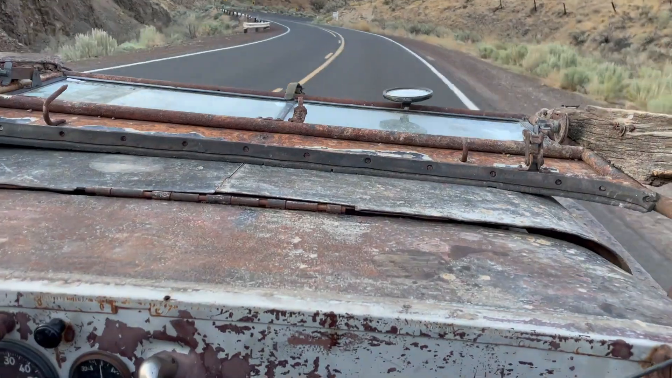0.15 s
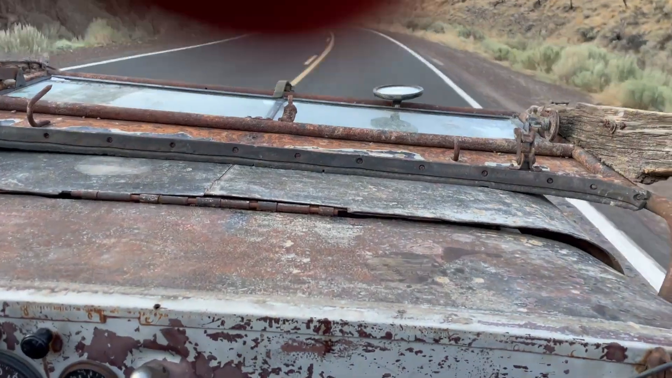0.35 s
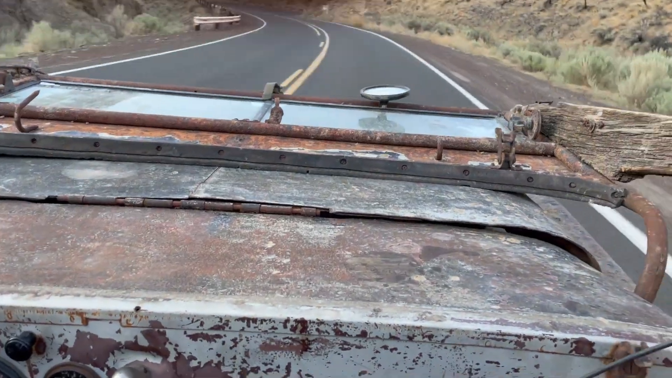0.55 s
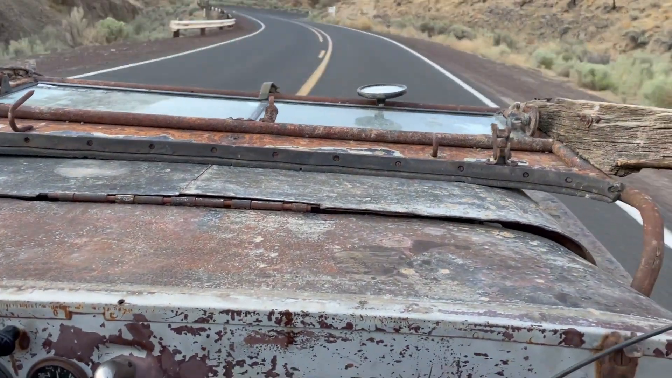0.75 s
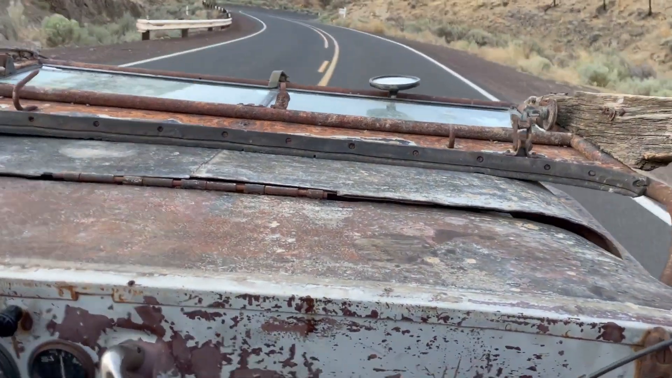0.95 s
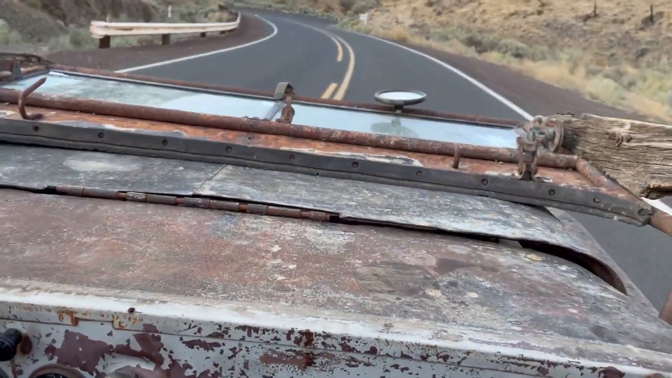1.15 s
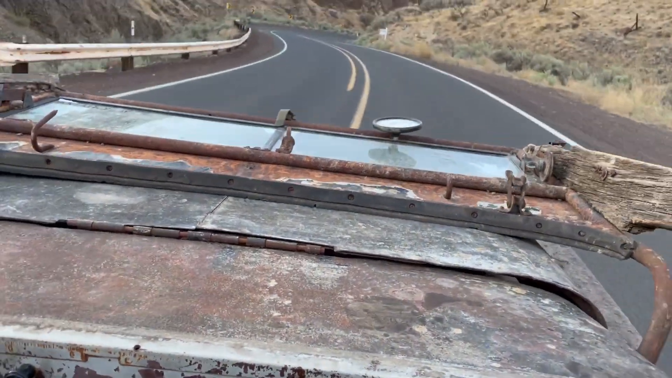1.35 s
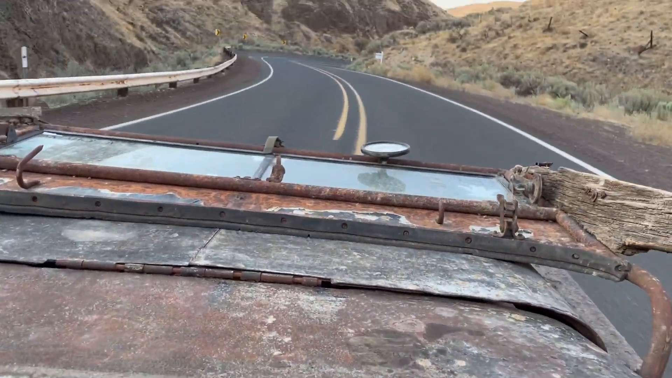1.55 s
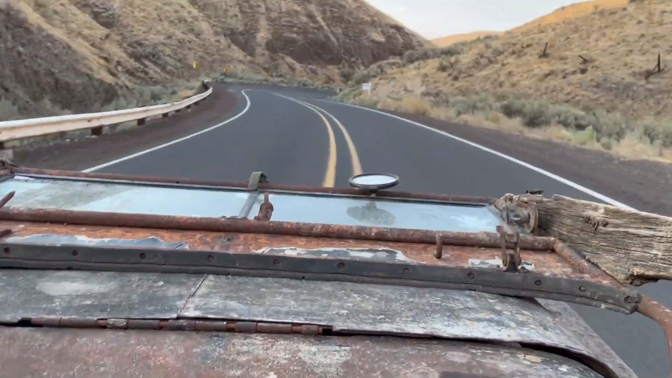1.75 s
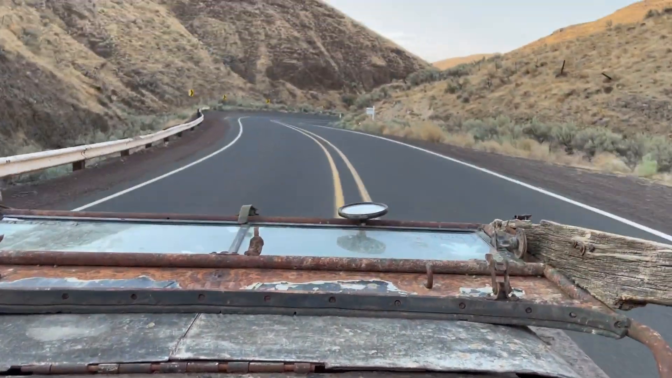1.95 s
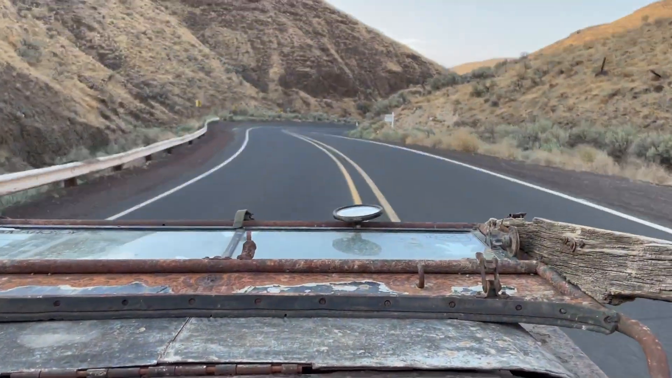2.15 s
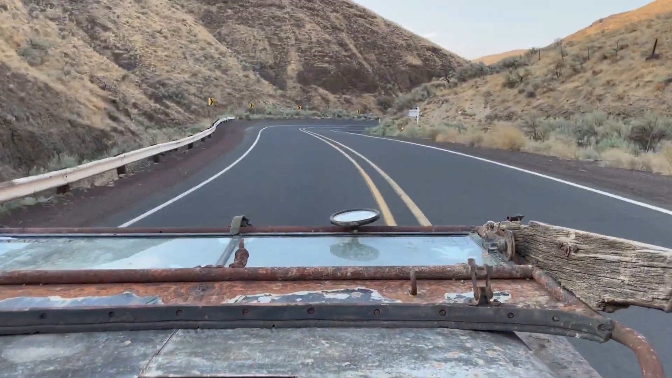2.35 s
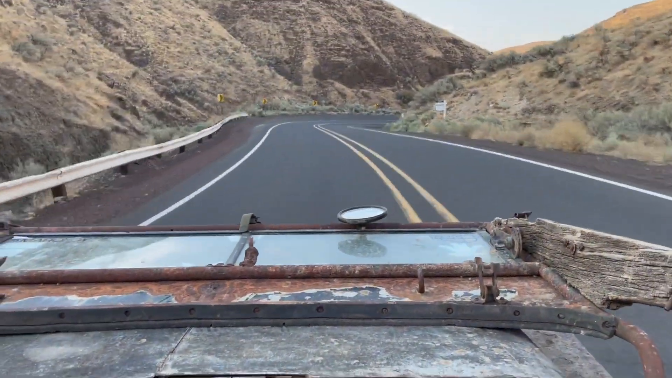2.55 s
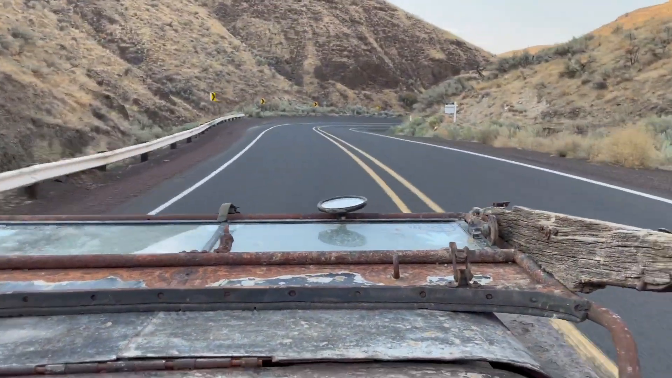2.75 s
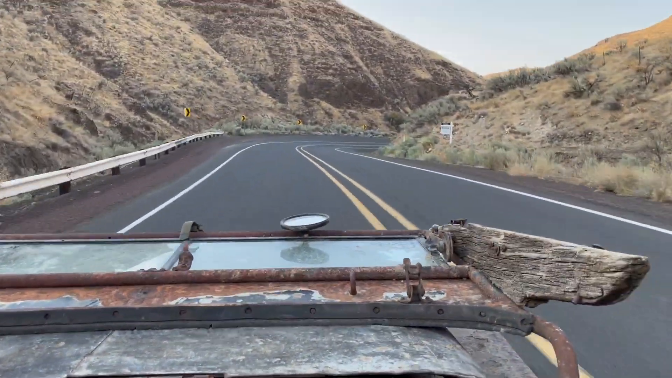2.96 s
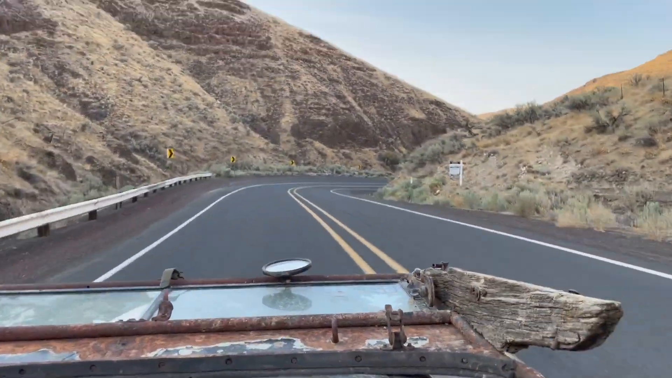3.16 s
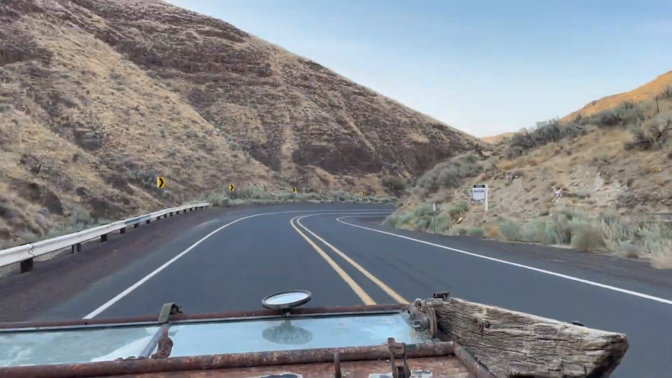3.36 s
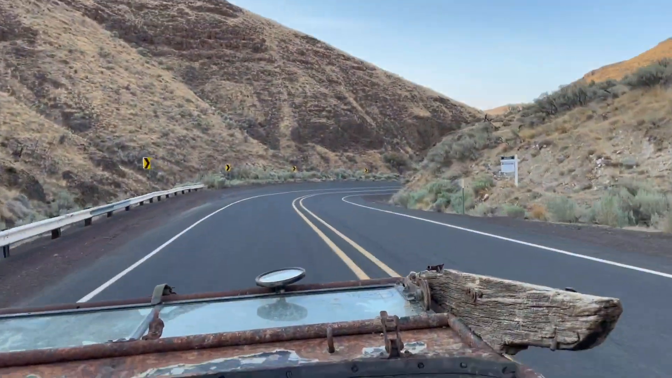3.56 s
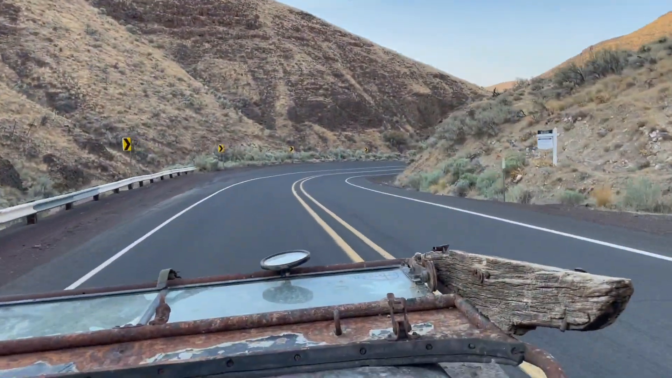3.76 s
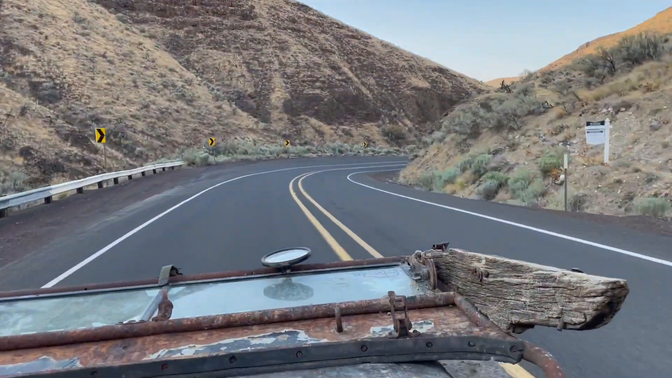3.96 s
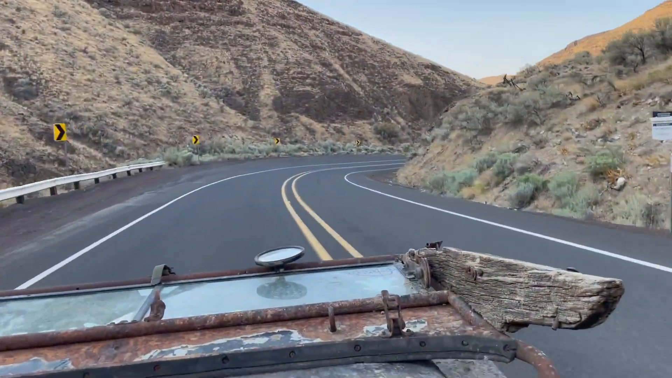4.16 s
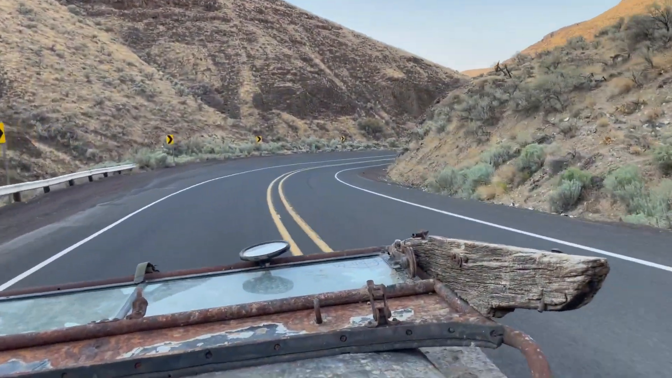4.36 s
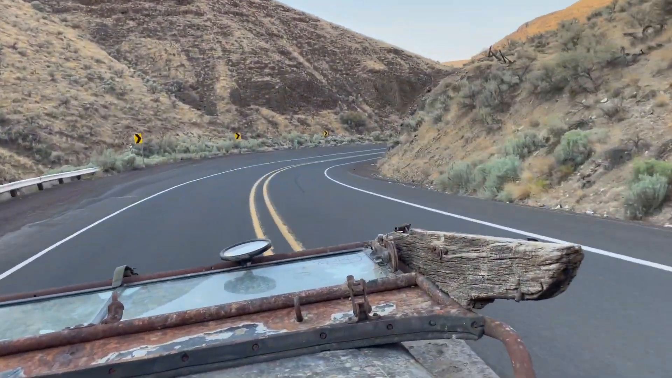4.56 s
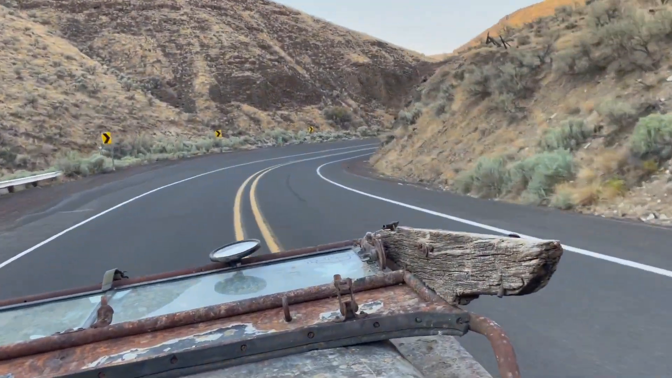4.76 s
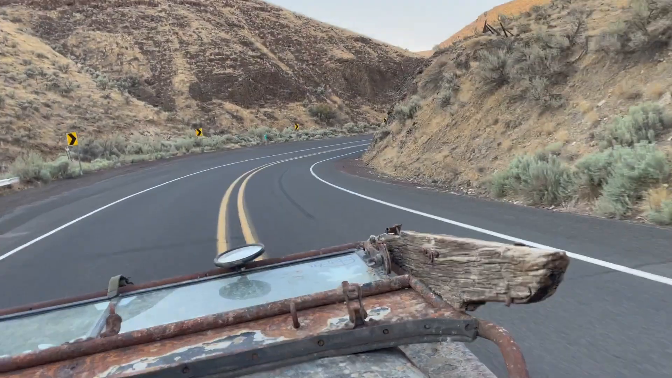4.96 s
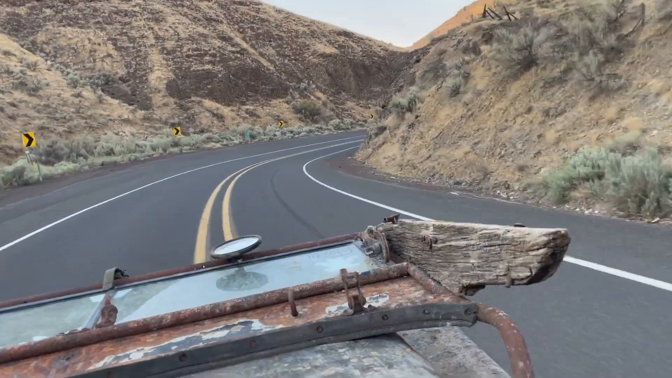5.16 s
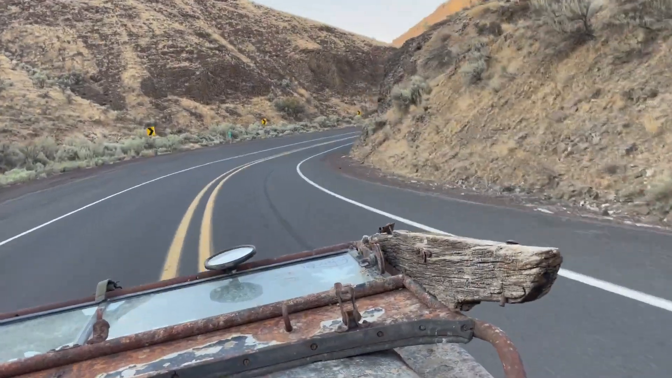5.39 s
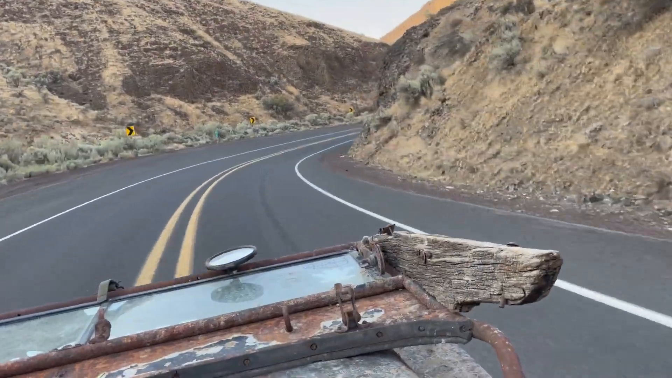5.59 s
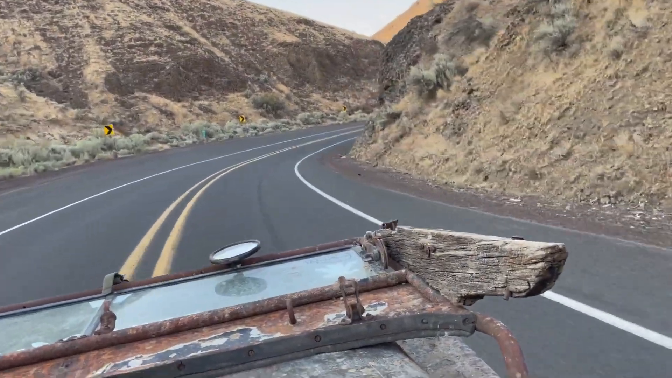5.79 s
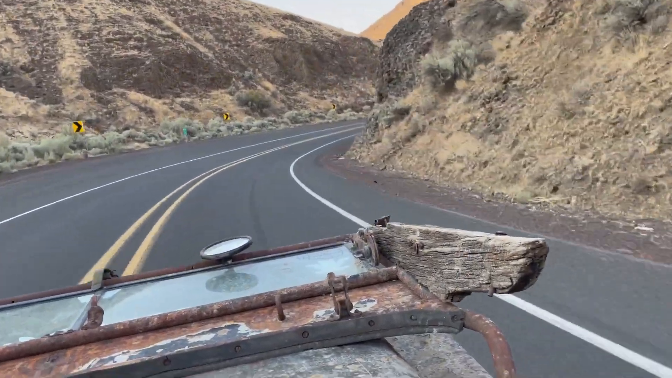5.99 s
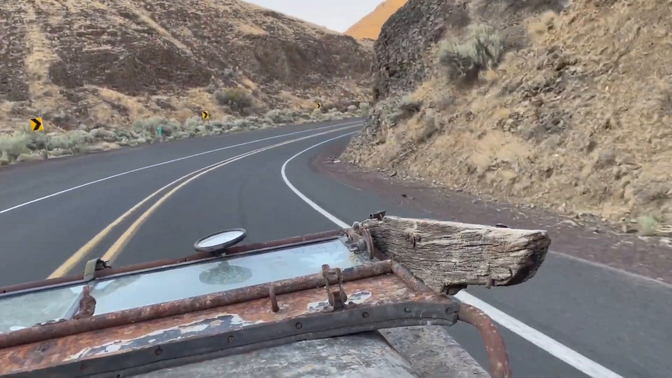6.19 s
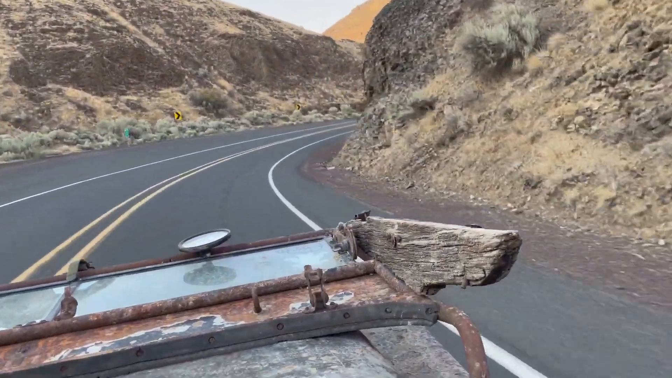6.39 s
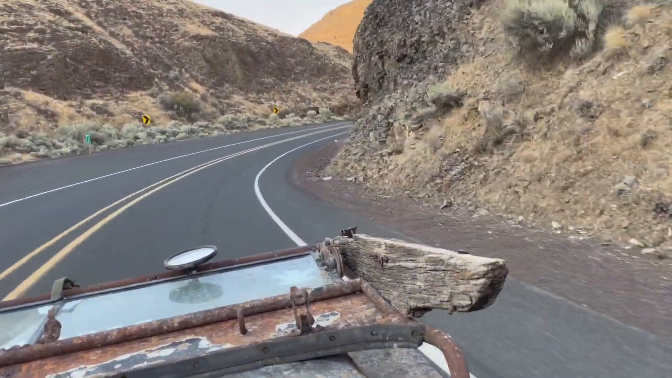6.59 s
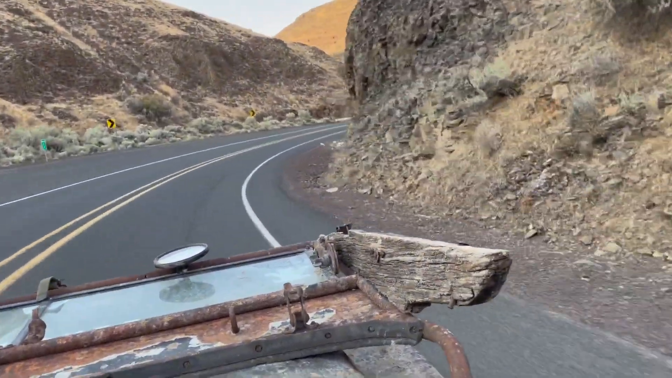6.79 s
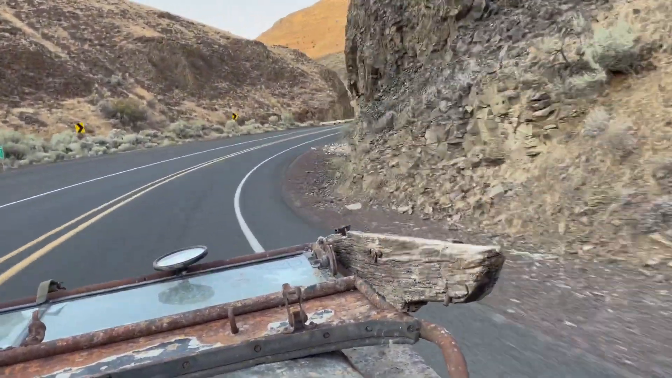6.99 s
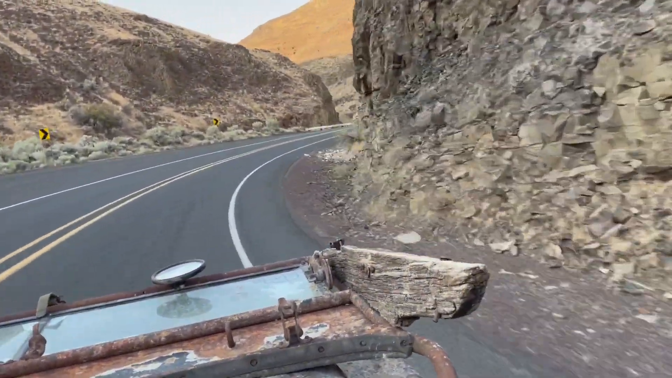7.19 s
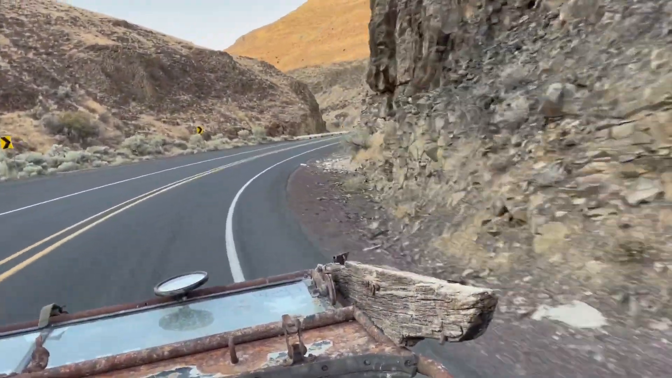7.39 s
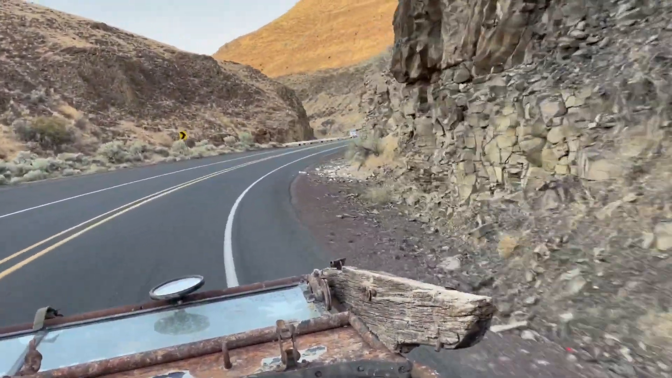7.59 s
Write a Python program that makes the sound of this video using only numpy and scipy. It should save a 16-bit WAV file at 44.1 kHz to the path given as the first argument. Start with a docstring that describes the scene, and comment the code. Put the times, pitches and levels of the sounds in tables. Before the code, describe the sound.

In an old open vehicle rolling fast down a paved canyon road, wind hits the unprotected stereo microphone. A thud and a band of airy rush, stronger on the left, open it; the rush fades after about a second as the wind swells into rough roaring, slapping and popping. Later it eases a little but keeps surging in gusts. Steady engine drone, tyre roar and thin hiss lie underneath, with a few dull metal knocks.

```python
"""Wind on a camera in an open vehicle

Wind buffets the two microphone ports of a camera held in an open vehicle rolling fast downhill.
Filtered noise, moved by gusts and random flutter, makes the thud, roar, rasp and fizz of the wind.
Short noise bursts are eddies that slap, puff, pop and crackle; a band of airy noise fades early on.
Underneath, steady noise makes the engine drone and tyre roar, and short rings are loose metal
knocking. The tyre hiss is one noise that reaches the two ports out of step.
"""
import sys
import numpy as np
from scipy import signal
from scipy.fft import rfft, irfft, next_fast_len
from scipy.io import wavfile
from scipy.ndimage import uniform_filter1d

SR = 44100
rng = np.random.default_rng(int(sys.argv[2]) if len(sys.argv) > 2 else 0)


def convert_level_to_amplitude(level_db):
    """Map a level in decibels to its linear amplitude factor."""
    exponent = np.asarray(level_db, float) / 20
    return 10 ** exponent


def persist_wave(psi):
    """Save psi, clipped to +-1, as 16-bit WAV."""
    counts = np.round(np.clip(psi, -1, 1) * 32767).astype(np.int16)
    wavfile.write(sys.argv[1], SR, np.atleast_2d(counts).T)


N = 336686
T = np.arange(N) / SR
HZ = np.fft.rfftfreq(N, 1 / SR)
SIDES = np.array([[0.5], [-0.5]])  # shares a left-over-right difference in dB between the ports

# Engine and tyre drone: [f/Hz, width/Hz, level/dB]
DRONE = [(74, 81, -35.5)]
# Colour of the tyre roar: [f/Hz, relative level per Hz/dB]
ROAD_COLOUR = [(200, 15), (500, 8), (1200, 11.5), (2000, 2.5), (2650, -3), (3000, -17), (4600, -11),
               (5400, -16.5)]
ROAD_DB = -31.5

# Strength of the tyre hiss: [t/s, level from about 7.5 to 14 kHz/dB]
HISS_LEVEL = [(0.04, -55.5), (0.65, -56.5), (3.34, -58.5), (3.67, -61), (4.46, -59.5), (4.61, -60.5),
              (6.83, -61), (7.02, -57.5), (7.63, -60)]
# Colour of the tyre hiss: [f/Hz, relative level per Hz/dB]
HISS_COLOUR = [(3000, -15), (4300, 3), (5600, 10), (6500, 9.5), (7700, 10), (9000, 7), (10500, 6),
               (12500, 3.5), (13300, -1), (14800, 3), (15800, -2)]
# How far the left port is ahead in the hiss: [f/Hz, lead/cycles]
HISS_LEAD = [(3200, 1.4), (4300, 1), (5300, .5), (6500, 0), (8250, -.5), (9800, -.75), (11500, -1),
             (13200, -1.25), (14600, -1.5)]

# Loose metal knocking on the body:
# [t/s, ring peak level/dB, main ring f/Hz, left over right/dB, tick over ring/dB]
METAL_KNOCKS = [(2.182, -14, 2540, -8, -40), (2.378, -13, 2350, 4, -40), (2.7334, -12, 2170, -2, -30),
                (4.529, -14, 2250, 2, -36), (7.05, -13.5, 2850, 5, -24)]
# Rings of the loose part: [multiple of the main ring, relative level/dB, time to fall 60 dB/s]
METAL_RINGS = [(.72, -9, .007), (1.0, 0, .013), (1.22, -5, .009), (1.6, -12, .006), (2.05, -19, .006)]

# Airy rush: band edges, level at left and right port, middle and time scale of its fade
RUSH_HZ, RUSH_DB, RUSH_END_S, RUSH_FADE_S = (1960, 2630), (-34.5, -43.5), 1.1, 0.12

# Tiny snaps at the left and right port: rate, level before size and band weighting
CRACKLE_PER_S, CRACKLE_DB = [380, 320], [-35.5, -35]

# Small eddies snapping at a port:
# [t/s, body peak level above 1.5 kHz/dB, centre f/Hz, bright edge over body/dB, left over right/dB]
EDDY_POPS = [(0.0863, -25, 2820, -25, 1), (0.2268, -22, 2380, -25, 5), (0.239, -23, 3300, -30, 4),
             (0.2914, -22, 4000, -16, 7), (0.2951, -24, 2820, -29, 6), (0.3876, -20, 2220, -31, 10),
             (0.4175, -21, 3180, -36, 7), (0.4568, -18, 2200, -20, 9), (0.473, -20, 2600, -30, 5),
             (0.485, -22, 2800, -30, 5), (0.575, -13, 2390, -32, 6), (0.5914, -15, 3990, -28, 7),
             (0.603, -19, 2500, -30, 5), (0.6216, -19, 2210, -29, 8), (0.7743, -17, 3000, -32, 10),
             (0.8655, -16, 2910, -31, 10), (0.9164, -20, 2890, -35, -4), (0.9866, -15, 2880, -29, 6),
             (1.0777, -17, 2720, -33, 1), (1.1826, -20, 3530, -32, 10), (1.2373, -14, 2640, -33, 1),
             (1.275, -18, 3180, -33, -1), (1.37, -11, 2500, -29, 3), (1.3774, -16, 2970, -31, 10),
             (1.477, -14, 3470, -33, 4), (1.557, -10, 3110, -28, 9), (1.6567, -14, 2180, -35, 1),
             (1.7135, -17, 2600, -29, 5), (1.769, -18, 3170, -32, 7), (1.7983, -10, 2870, -29, 8),
             (1.9281, -19, 2420, -27, 3), (1.9595, -18, 2480, -32, 1), (1.9909, -18, 2900, -34, -10),
             (2.0656, -17, 3010, -26, 5), (2.141, -13, 2970, -41, 10), (2.3371, -18, 2540, -34, -1),
             (2.3596, -20, 2960, -31, 10), (2.4618, -17, 2460, -31, 8), (2.4868, -15, 3070, -31, -1),
             (2.7278, -12, 2140, -29, -1), (2.7404, -15, 2540, -38, -4), (2.8224, -14, 2410, -29, 6),
             (2.8402, -13, 2240, -32, 2), (2.8467, -11, 2720, -35, 7), (3.0382, -16, 2840, -36, -10),
             (3.1, -19, 2940, -30, 3), (3.245, -15, 2300, -28, 1), (3.2516, -14, 2320, -20, 5),
             (3.3688, -16, 2830, -35, 2), (3.5034, -15, 2340, -39, 3), (3.9058, -19, 3530, -28, 1),
             (3.933, -22, 2140, -28, 10), (4.4897, -22, 2760, -33, 10), (4.5243, -13, 2030, -37, 6),
             (4.592, -11, 3610, -30, 4), (4.9095, -15, 2800, -32, 8), (5.14, -16, 2000, -41, -10),
             (5.1923, -15, 1900, -32, 9), (5.3573, -21, 2990, -32, -3), (5.9386, -13, 1870, -41, 9),
             (6.467, -25, 2160, -28, -5), (6.8443, -20, 2550, -33, 8), (6.85, -22, 3000, -30, 5),
             (6.87, -17, 3180, -32, 7), (6.9427, -22, 2250, -30, 0), (7.0616, -20, 2930, -17, 6),
             (7.435, -25, 2950, -36, -4), (7.4834, -21, 3090, -31, 0)]
# Wide colour of pops, also the weight of crackle bands: [f/Hz, relative level per Hz/dB]
POP_COLOUR = [(500, 7), (1500, 18.5), (3000, 5), (5000, 0), (7000, -5)]
POP_WIDTH, POP_SKIRT_DB = 0.42, 2  # spread in log frequency, relative weight of the dull skirt
POP_RISE_S, POP_ALIKE = 0.00059, 2  # rise, weight of the noise common to both ports

# Small eddies of the roar: rate, level against the roar curve before the random size
PUFFS_PER_S, PUFF_DB = 140, -12
PUFF_SPREAD_DB, PUFF_CYCLES = 1.67, 0.88  # spread of sizes, rise in cycles of the centre frequency

# Large eddies slapping both ports: [t/s, peak level of the port average/dB, centre f/Hz]
EDDY_SLAPS = [(0.469, -13.5, 288), (0.6, -13, 627), (0.691, -20, 460), (0.881, -10, 293), (1.0, -8, 203),
              (1.049, -8, 237), (1.073, -3.5, 470), (1.17, -9, 323), (1.227, -11, 229), (1.311, -13, 250),
              (1.433, -4, 343), (1.801, -5.5, 396), (1.882, -10, 573), (1.931, -8.5, 175), (2.064, -8, 340),
              (2.113, -4.5, 375), (2.144, -2.5, 343), (2.487, -8, 293), (2.591, -4.5, 457),
              (2.654, -8.5, 510), (2.76, -9, 365), (2.834, -4, 286), (2.923, -12, 307), (3.026, -8, 364),
              (3.071, -10.5, 401), (3.104, 1, 217), (3.24, -8, 272), (3.322, -8, 400), (3.839, -11, 200),
              (3.906, -8.5, 232), (3.942, -11, 458), (4.381, -12, 396), (4.522, -12, 895),
              (4.571, -14, 323), (4.586, -17, 800), (4.694, -11, 303), (4.806, -6, 229), (5.002, -25, 335),
              (5.086, -9.5, 361), (5.136, -12, 670), (5.218, -11, 340), (5.254, -8, 423), (5.341, -11, 188),
              (5.44, -8.5, 300), (5.763, -6, 296), (5.889, -10, 440), (6.03, -24, 215), (6.186, -11.5, 626),
              (6.287, -16, 240), (6.673, -26, 440), (6.781, -17, 294), (6.85, -28, 1800), (6.904, -23, 410),
              (7.063, -16, 1200), (7.383, -12, 336), (7.599, -13, 262)]

# Slow course of the wind past the ports:
# [t/s, roar level before layer shares/dB, thud over roar/dB, treble over roar/dB]
WIND_COURSE = [(0.04, -24.5, 14, -5), (0.3, -22, 5.5, -4), (0.65, -19, -0.5, -7.5), (0.95, -15.5, 1.5, 0.5),
               (1.25, -8, -6.5, -11.5), (1.6, -16, 4, -5), (2, -13, -10, -8), (2.4, -15.5, -1, -6),
               (2.9, -15, -2.5, -5), (3.3, -13.5, -4, -7), (3.55, -14.5, -4.5, -5.5),
               (3.75, -19.5, 4.5, -6), (4.1, -20, -1.5, -3), (4.5, -19.5, 6, -8), (4.9, -20, -3, 0),
               (5.3, -16, -5, -9), (5.6, -19.5, -4, -4.5), (5.9, -18, -0.5, -4.5), (6.2, -22.5, -8, -4.5),
               (6.6, -24.5, 7, -5), (7, -16, -4, -9.5), (7.3, -19.5, -5, -5), (7.63, -23, 5, -2)]
# Short changes of the wind, mostly surges; negative values are dips, often with brighter air.
# Before each layer takes its share: [middle t/s, length/s, swell/dB, brightening/dB]
WIND_GUSTS = [(0.215, 0.048, 7.5, -3.5), (0.469, 0.19, 7.5, -8.5), (0.589, 0.11, -3, 11.5),
              (0.878, 0.1, -3, 0), (1.083, 0.014, 7.5, -4), (1.27, 0.05, 3.5, 1.5), (1.335, 0.066, 5.5, -4),
              (1.372, 0.022, -4, 11), (1.56, 0.035, 5, -0.5), (1.717, 0.042, 5.5, -5),
              (1.811, 0.018, 5, -3.5), (2.156, 0.04, 0.5, 3), (2.485, 0.076, 6.5, -5),
              (2.839, 0.045, 1, 2.5), (3.108, 0.017, 1, 6), (3.333, 0.03, 3.5, 2), (3.498, 0.083, 3, -5),
              (3.912, 0.31, 3.5, -3), (3.99, 0.046, 5.5, -2.5), (4.121, 0.025, 6.5, -6),
              (4.296, 0.026, 8, -4.5), (4.425, 0.06, 5.5, -0.5), (4.585, 0.034, 8.5, -4),
              (4.869, 0.27, 8.5, -15), (5.25, 0.04, 7, -5), (5.367, 0.033, 3, 2), (5.403, 0.023, 12, -17),
              (5.447, 0.041, -8.5, 13), (5.762, 0.031, 5.5, -4), (5.947, 0.038, 8, -10),
              (6.042, 0.014, 12, -13), (6.291, 0.029, 9, -10), (6.467, 0.023, 1.5, 7),
              (6.69, 0.026, 9.5, -5.5), (6.85, 0.011, -1, 7), (7.1, 0.049, -1.5, 1.5),
              (7.149, 0.023, 14, -17), (7.503, 0.061, 8, -9.5)]
# Brief drops of the wind, before each layer takes its share:
# [middle t/s, length/s, depth/dB, brightening/dB]
WIND_LULLS = [(0.549, 0.043, 11, 6), (0.754, 0.037, 14, 15), (0.968, 0.028, 14, -2), (1.148, 0.33, 8, 5.5),
              (1.871, 0.042, 7, 4), (2.016, 0.053, 12.5, 14), (2.305, 0.022, 5.5, 3), (3.672, 0.1, 4.5, 5),
              (4.026, 0.053, 19.5, 17), (4.266, 0.022, 14.5, 17), (4.548, 0.015, 4, -10),
              (5.064, 0.044, 8.5, 3), (5.124, 0.019, 7, 2), (5.335, 0.026, 11, 0), (5.493, 0.042, 8, -1),
              (5.872, 0.021, 10, 0), (6.077, 0.015, 11, 7), (6.146, 0.018, 8, 3), (6.256, 0.023, 6, -2),
              (6.755, 0.013, 19, 11), (7.289, 0.038, 3.5, -2), (7.369, 0.089, 7, 8)]
# Short swells of the thud alone, with one dip at the start: [middle t/s, length/s, swell/dB]
THUD_SWELLS = [(0.115, 0.05, -7), (0.489, 0.034, 5), (0.644, 0.088, 9), (0.789, 0.035, 7),
               (1.093, 0.062, 9), (1.437, 0.073, 3), (1.791, 0.096, 6), (1.961, 0.044, 19),
               (2.086, 0.052, 10), (2.161, 0.11, 6), (2.24, 0.031, 11), (2.515, 0.051, 7.5),
               (2.615, 0.03, 15.5), (2.754, 0.035, 9), (2.949, 0.036, 10.5), (3.223, 0.12, 9),
               (3.338, 0.025, 8), (3.468, 0.023, 6), (3.867, 0.19, 5.5), (3.932, 0.024, 7),
               (4.141, 0.034, 16), (4.321, 0.092, 4), (4.944, 0.032, 17), (5.278, 0.27, 4.5),
               (5.767, 0.051, 8.5), (5.857, 0.031, 9), (6.221, 0.049, 12), (6.386, 0.036, 4),
               (6.69, 0.066, 1), (7.079, 0.043, 8), (7.149, 0.033, 19.5), (7.513, 0.087, 4)]
# How thud, roar, rasp, low and high fizz follow the wind: [share of swell, share of brightening]
LAYER_FOLLOW = [(0.11, 0.065), (0.56, -0.11), (1, 0.45), (0.68, 0.46), (1.38, 0.97)]
# Thud, roar, rasp, low and high fizz: [low edge f/Hz, high edge f/Hz, level over its curve/dB,
# shared flutter/dB, own flutter/dB, flutter at each port/dB, passing time of an eddy/s]
WIND_LAYERS = [(20, 146, -8, 0.5, 0, -2, 0.014), (153, 473, -7, 1.86, 1.6, -0.1, 0.0037),
               (628, 1470, -6.5, 0.43, 2.3, 1, 0.0043), (1650, 2260, -12.5, 0.5, 3.5, 0.5, 0.0084),
               (2650, 6700, -17, 2, 2, 1, 0.0021)]
# Colour of the wind: [f/Hz, relative level per Hz/dB]
WIND_COLOUR = [(12, -45), (20, -1), (45, 1.5), (71, 5), (153, -6), (455, -6.5), (825, -10.5), (2340, -29),
               (4140, -37), (4900, -38), (5600, -42.5), (6300, -40.5), (7500, -46.5), (9750, -120),
               (16500, -120)]
# Likeness of the noise at the two ports: [f/Hz, correlation from -1 to 1]
PORT_LIKENESS = [(30, 0.55), (70, 0.91), (150, 0.78), (250, 0.84), (400, 0.46), (700, 0.22), (1200, 0.074),
                 (3000, 0.0055), (4200, 0.48), (5400, -0.19), (6500, 0.21), (7600, -0.42)]
# Balance of the port noise: [f/Hz, left over right/dB]
PORT_LEAN = [(60, 2), (150, 0), (380, 0), (950, -0.5), (1800, -4), (2000, -5.5), (3000, -4), (4500, -2),
             (5980, -1), (15000, -23)]
# The fizz drifts from left to right as the camera is raised into the wind: left over right, time scale
LEAN_FROM_DB, LEAN_TO_DB, TURN_S = 5.5, -1, 1.3

# Small gusts in one band only: [f/Hz, rms depth/dB]
PATCH_DEPTH = [(150, 0.73), (500, 2.55), (1500, 2.44), (4500, 1.5)]
PATCH_HZ, PATCH_S = 700, 0.011  # width and length of the averaging that shapes a patch


def evened(x):
    """Scales to an rms of 1."""
    return x / np.sqrt(np.mean(x ** 2) + 1e-20)


def read(points, hz):
    """Reads a table on a log-frequency axis."""
    f, value = np.transpose(points)
    return np.interp(np.log(hz + 1), np.log(f + 1), value)


def add(mix, s, sound):
    """Adds a sound into both channels at time s."""
    part = mix[:, round(s * SR):][:, :sound.shape[1]]
    part += sound[:, :part.shape[1]]


def band(lo_hz, hi_hz):
    """Soft-edged pass band; neighbours sharing an edge add up to nearly constant power."""
    return 1 / np.sqrt((1 + (lo_hz / (HZ + 1)) ** 6) * (1 + (HZ / hi_hz) ** 6))


def hump(hz, centre_hz, width):
    """A bell-shaped band around a centre, with its width in log frequency."""
    return np.exp(-(np.log((hz + 1) / centre_hz) / width) ** 2)


def flutter(eddy_s, count=1):
    """Random level wobble of spread 1, from slow swings down to the passing time of one eddy."""
    size = next_fast_len(N)
    hz = np.fft.rfftfreq(size, 1 / SR)
    slope = (hz / (hz + 4)) ** 2 / np.sqrt(hz + 1) / (1 + (hz * eddy_s) ** 2)
    noise = rng.standard_normal((count, size))
    return evened(irfft(rfft(noise) * slope, size)[:, :N])


def port_noise():
    """Spectra of white noise at the two ports, with a likeness and balance set by frequency."""
    a, b = rfft(rng.standard_normal((2, N)))
    same = np.clip(read(PORT_LIKENESS, HZ), -1, 1)
    lean = convert_level_to_amplitude(read(PORT_LEAN, HZ) / 2)
    return np.array([a * lean, (same * a + np.sqrt(1 - same ** 2) * b) / lean])


def burst(noise, colour, rise_s):
    """A short puff of coloured noise with a quick rise and an exponential fall."""
    t = np.arange(noise.shape[-1]) / SR
    return evened(irfft(rfft(noise) * colour)) * (t / rise_s) * np.exp(1 - t / rise_s)


def random_hits(count_per_s, spread_db):
    """Single samples at random moments, with random sizes that favour the small."""
    size = convert_level_to_amplitude(spread_db * np.minimum(rng.exponential(1, N), 4))
    return size * (rng.random(N) < count_per_s / SR)


def drone(noise):
    """Engine and tyre drone: low noise ringing in a body resonance."""
    [(centre_hz, width_hz, level_db)] = DRONE
    resonance = 1 / (1 + (2 * (HZ - centre_hz) / width_hz) ** 2)
    return convert_level_to_amplitude(level_db) * evened(irfft(noise * resonance, N))


def tyre_roar(noise):
    """The broad steady roar of the tyres: coloured noise without any swell."""
    colour = convert_level_to_amplitude(read(ROAD_COLOUR, HZ)) * band(190, 5000)
    return convert_level_to_amplitude(ROAD_DB) * evened(irfft(noise * colour, N))


def tyre_hiss(shared):
    """One road hiss, out of step at the ports, shaken by random flutter partly shared with the wind."""
    a, b, c = rfft(rng.standard_normal((3, N)))
    turn = np.exp(1j * np.pi * read(HISS_LEAD, HZ))  # half the lead on each side
    pair = np.array([a * turn + 0.084 * b, a / turn + 0.14 * c])
    pair = pair * convert_level_to_amplitude(read(HISS_COLOUR, HZ)) * band(3000, 17000)
    top = irfft(pair.mean(0) * band(7500, 14000), N)  # the level counts in this band
    pair /= np.sqrt(np.mean(top ** 2))
    s, level_db = np.transpose(HISS_LEVEL)
    wobble_db = 0.8 * shared + 1.7 * flutter(0.011)
    return irfft(pair, N) * convert_level_to_amplitude(np.interp(T, s, level_db) + wobble_db)


def knocks():
    """Each knock rings the loose part briefly, with a thin bright tick of contact."""
    t, hz = np.arange(2048) / SR, np.fft.rfftfreq(2048, 1 / SR)
    out = np.zeros((2, N))
    bright = 1 / (1 + (8500 / (hz + 1)) ** 8)
    for s, peak_db, ring_hz, pan_db, tick_db in METAL_KNOCKS:
        ring = np.zeros(2048)
        for multiple, level_db, t60 in METAL_RINGS:
            cycles = multiple * ring_hz * t + rng.random()
            ring += convert_level_to_amplitude(level_db - 60 * t / t60) * np.sin(2 * np.pi * cycles)
        ring *= 1 - np.exp(-t / 0.0003)  # soft start
        tick = burst(rng.random(2048) - 0.5, bright, 0.0006)
        knock = ring / abs(ring).max() + convert_level_to_amplitude(tick_db) * tick / abs(tick).max()
        add(out, s, convert_level_to_amplitude(peak_db + pan_db * SIDES) * knock)
    return out


def rush(shared):
    """A band of airy noise, mostly at the left port, that fades as the camera is raised."""
    noise = irfft(rfft(rng.standard_normal((2, N))) * band(*RUSH_HZ) ** 3, N)
    fade = 1 / (1 + np.exp((T - RUSH_END_S) / RUSH_FADE_S))
    return evened(noise) * convert_level_to_amplitude(np.array(RUSH_DB)[:, None] + 1.5 * shared) * fade


def crackle(fizz_db):
    """Random small puffs in eight bands, separate at each port, stronger when the fizz is strong."""
    hz, out = np.fft.rfftfreq(1024, 1 / SR), np.zeros((2, N))
    strength = evened(convert_level_to_amplitude(fizz_db))
    for port in range(2):
        for centre_hz in np.geomspace(900, 5200, num=8):
            hits = random_hits(CRACKLE_PER_S[port] / 8, 1.8)
            noise = rng.standard_normal(1024)
            snap = burst(noise, hump(hz, centre_hz, 0.36), 1.13 / centre_hz)
            snap = convert_level_to_amplitude(read(POP_COLOUR, centre_hz) - 13.5) * snap
            out[port] += convert_level_to_amplitude(CRACKLE_DB[port]) * signal.oaconvolve(hits * strength, snap)[:N]
    return out


def pops():
    """Bursts a few milliseconds long: a body around its centre, a dull skirt and a bright edge."""
    hz, out = np.fft.rfftfreq(1024, 1 / SR), np.zeros((2, N))
    lead = 64  # samples of room ahead of the burst
    skirt = convert_level_to_amplitude(read(POP_COLOUR, hz) - read(POP_COLOUR, 2100)) / (1 + (hz / 6500) ** 4)
    edge = 1 / (1 + (7500 / (hz + 1)) ** 8)

    def peak(spectrum):
        return abs(signal.hilbert(irfft(spectrum))).max()

    for s, peak_db, centre_hz, bright_db, pan_db in EDDY_POPS:
        noise = rng.standard_normal((2, 1024))
        puff = burst(noise + POP_ALIKE * noise[0], 1, POP_RISE_S)
        z = rfft(np.roll(puff, lead, axis=1))
        z = z / uniform_filter1d(abs(z), size=9, axis=1)  # an even spectrum
        z = z * convert_level_to_amplitude(pan_db * SIDES)
        body = hump(hz, centre_hz, POP_WIDTH) + convert_level_to_amplitude(POP_SKIRT_DB) * skirt
        middle = z.mean(0)
        body_peak = peak(middle * body * (hz > 1500))
        edge_peak = peak(middle * edge)
        colour = body / body_peak + convert_level_to_amplitude(bright_db) * edge / edge_peak
        add(out, s - lead / SR, convert_level_to_amplitude(peak_db) * irfft(z * colour))
    return out


def puffs(roar_db):
    """Random tight puffs of low air in ten bands, most alike at both ports in the lowest."""
    hz, out = np.fft.rfftfreq(2048, 1 / SR), np.zeros((2, N))
    for centre_hz in np.geomspace(120, 900, num=10):
        hits = random_hits(PUFFS_PER_S / 10, PUFF_SPREAD_DB) * convert_level_to_amplitude(roar_db + PUFF_DB)
        noise = rng.standard_normal((2, 2048))
        noise = noise + 500 / centre_hz * noise[0]
        puff = burst(noise, hump(hz, centre_hz, 0.51), PUFF_CYCLES / centre_hz)
        out += signal.oaconvolve(hits[None], puff, axes=1)[:, :N]
    return out


def slaps():
    """Dull bursts some ten milliseconds long, each around its own centre, mostly alike at both ports."""
    hz, out = np.fft.rfftfreq(4096, 1 / SR), np.zeros((2, N))
    for s, peak_db, centre_hz in EDDY_SLAPS:
        noise = rng.standard_normal((2, 4096))
        slap = burst(noise + 5.3 * noise[0], hump(hz, centre_hz, 0.54), 0.0028)
        add(out, s, convert_level_to_amplitude(peak_db) * slap / abs(slap.mean(0)).max())
    return out


def bumps(rows):
    """Smooth rises or dips in dB around each middle time, a curve for each column after the length."""
    total = 0
    for s, length, *db in rows:
        shape = np.exp(-((T - s) / length) ** 2 * 4 * np.log(2))  # length is the width at half height
        total = total + shape * np.array(db)[:, None]
    return total


def airflow():
    """Level curves of the five wind layers: slow airflow, gusts, lulls, thud swells; fizz balance."""
    s, *columns = np.transpose(WIND_COURSE)
    roar_db, thud_db, treble_db = (np.interp(T, s, column) for column in columns)
    swell_db, bright_db = bumps(WIND_GUSTS)
    depth_db, thin_db = bumps(WIND_LULLS)
    over_roar = [thud_db + bumps(THUD_SWELLS)[0], 0, treble_db, treble_db, treble_db]
    levels = []
    for over_db, (much, tilt) in zip(over_roar, LAYER_FOLLOW):
        change_db = much * (swell_db - depth_db) + tilt * (bright_db + thin_db)
        levels.append(roar_db + over_db + change_db)
    pan_db = LEAN_TO_DB + (LEAN_FROM_DB - LEAN_TO_DB) * np.exp(-T / TURN_S)
    return levels, pan_db


def patchy(x):
    """Small gusts raise and lower short patches of the spectrum, each band on its own."""
    hz, t, z = signal.stft(x, SR, nperseg=256)
    field = rng.standard_normal((len(hz), len(t)))
    bins, frames = max(round(PATCH_HZ / hz[1]), 1), max(round(PATCH_S / t[1]), 1)
    for _ in range(2):
        field = uniform_filter1d(field, bins, 0)
        field = uniform_filter1d(field, frames, 1)
    gain = convert_level_to_amplitude(read(PATCH_DEPTH, hz)[:, None] * evened(field))
    gain = gain / np.sqrt(np.mean(gain ** 2, 1, keepdims=True))  # mean power gain of 1 in each band
    return signal.istft(z * gain, SR, nperseg=256)[1][:, :N]


def wind(shared, levels, pan_db):
    """Each size of eddy follows its level curve, with flutter shared by all, its own and per port."""
    swing_db = pan_db * SIDES  # the fizz leans from port to port
    levels = levels[:3] + [db + swing_db for db in levels[3:]]
    out, noise = np.zeros((2, N)), port_noise() * convert_level_to_amplitude(read(WIND_COLOUR, HZ))
    for level_db, row in zip(levels, WIND_LAYERS):
        lo_hz, hi_hz, share_db, shared_db, own_db, port_db, eddy_s = row
        wobble_db = shared_db * shared + own_db * flutter(eddy_s)
        wobble_db = wobble_db + port_db * flutter(eddy_s, count=2)
        layer = irfft(noise * band(lo_hz, hi_hz), N) * convert_level_to_amplitude(wobble_db)
        layer /= np.sqrt(np.mean(layer.mean(0) ** 2))
        out += layer * convert_level_to_amplitude(level_db + share_db)
    return out


def scene():
    """Drone, tyres and knocks under the wind with its rush, crackle, pops, puffs and slaps."""
    shared = flutter(0.052)
    levels, pan_db = airflow()
    low_noise = port_noise()
    ground = drone(low_noise) + tyre_roar(low_noise) + tyre_hiss(shared) + knocks()
    eddies = crackle(levels[-1]) + pops() + puffs(levels[1]) + slaps()
    return ground + eddies + patchy(rush(shared) + wind(shared, levels, pan_db))


def low_pass(x):
    """Removes everything above the highest recorded frequency."""
    return signal.sosfilt(signal.butter(12, 16990, fs=SR, output="sos"), x)


def record(dry):
    """Low cut, a ceiling that rounds off the largest peaks, a treble limit and a silent first moment."""
    low_cut = signal.butter(4, 42, "high", fs=SR, output="sos")
    cut = signal.sosfilt(low_cut, dry)
    soft = cut / (1 + cut ** 4) ** (1 / 4)
    treble_limit = signal.firwin(511, 15800, window=("kaiser", 8), fs=SR)
    limited = signal.oaconvolve(soft, treble_limit[None], "same")
    return low_pass(limited * (T > 0.0355))


dry = scene()
out = record(dry)
persist_wave(out)
```